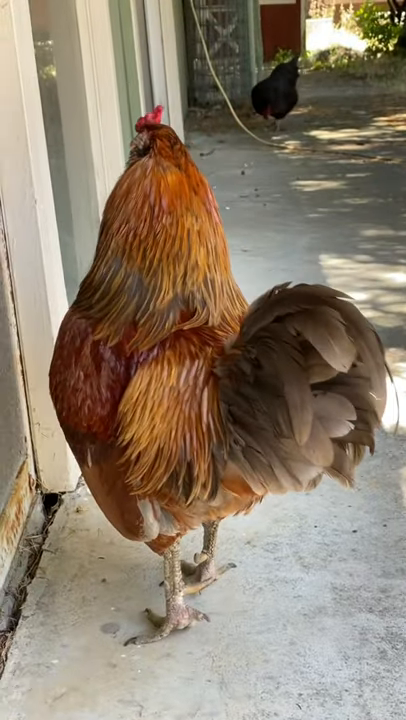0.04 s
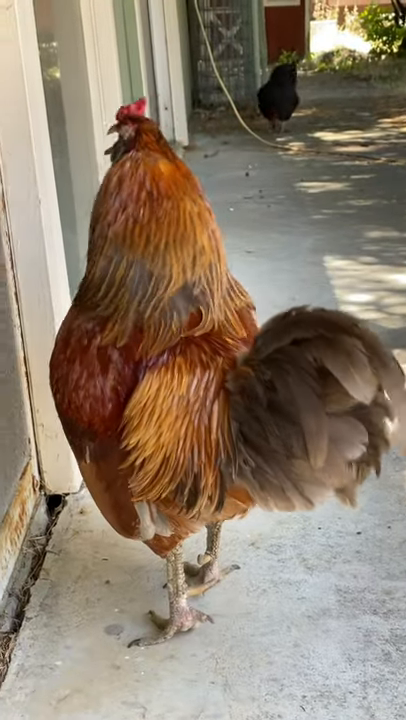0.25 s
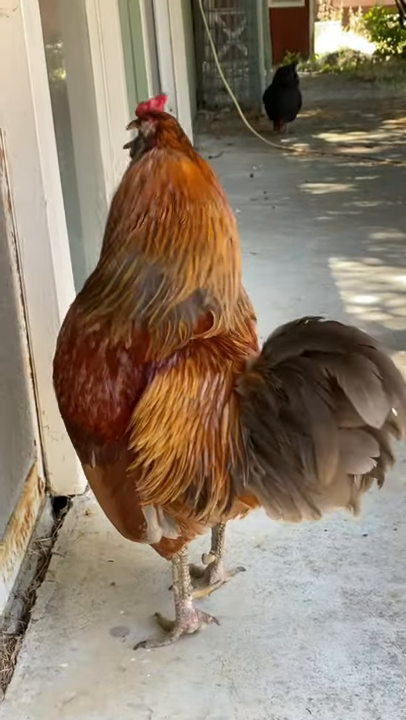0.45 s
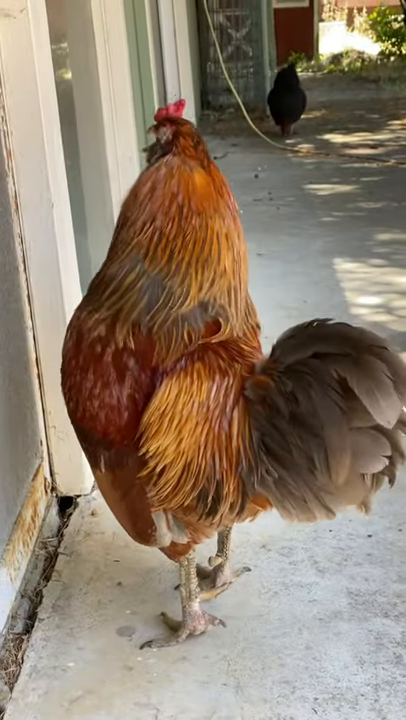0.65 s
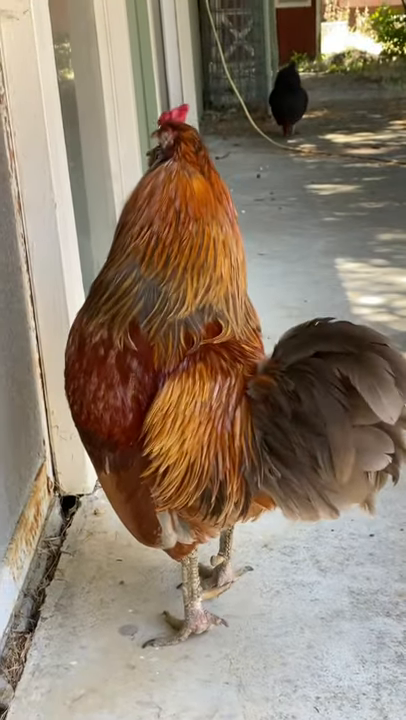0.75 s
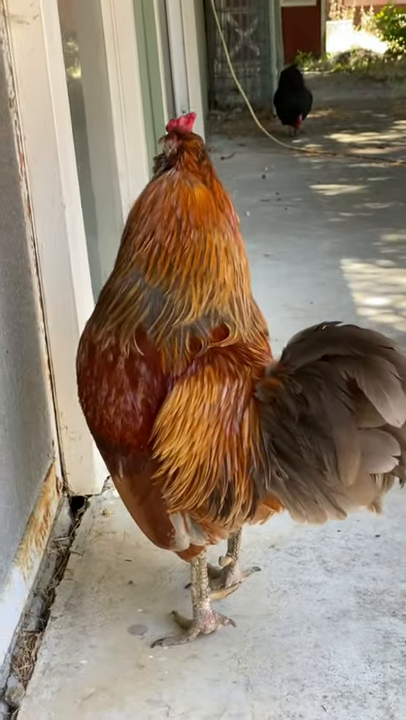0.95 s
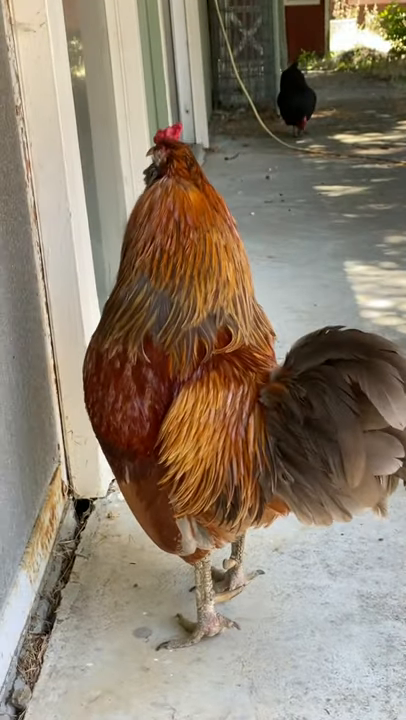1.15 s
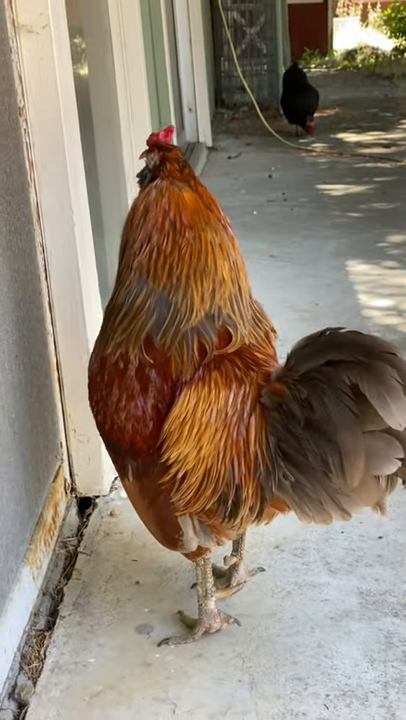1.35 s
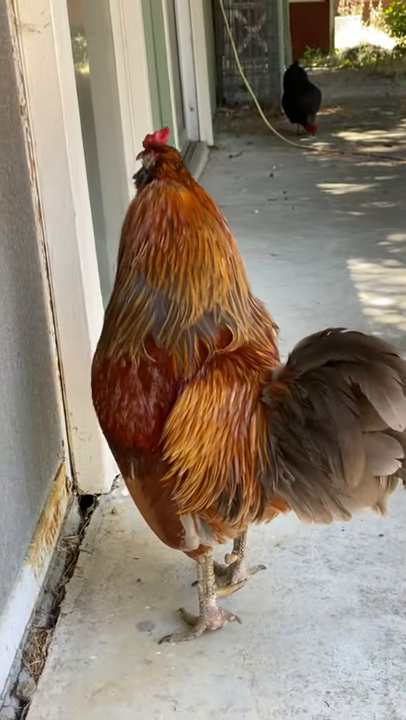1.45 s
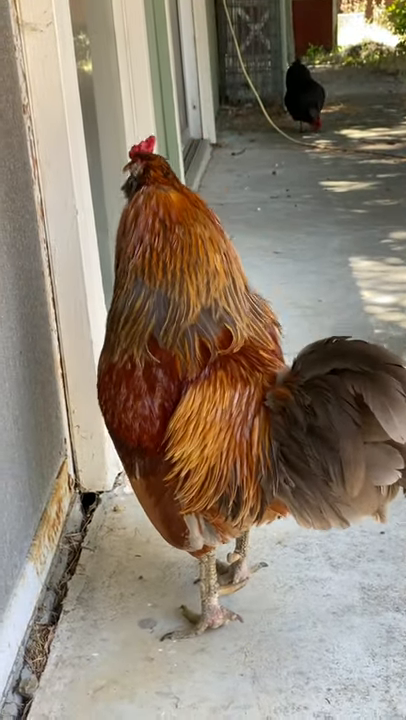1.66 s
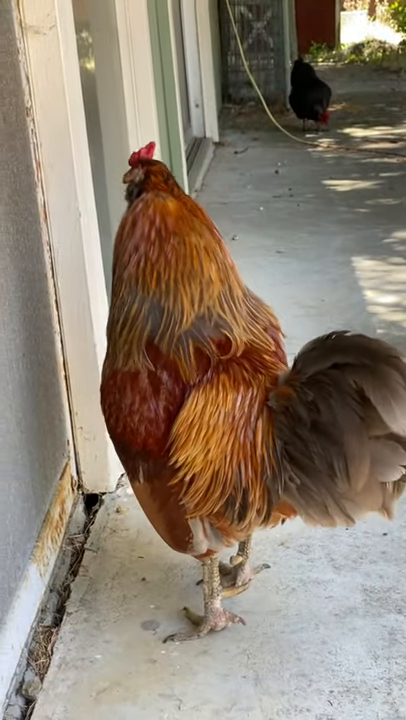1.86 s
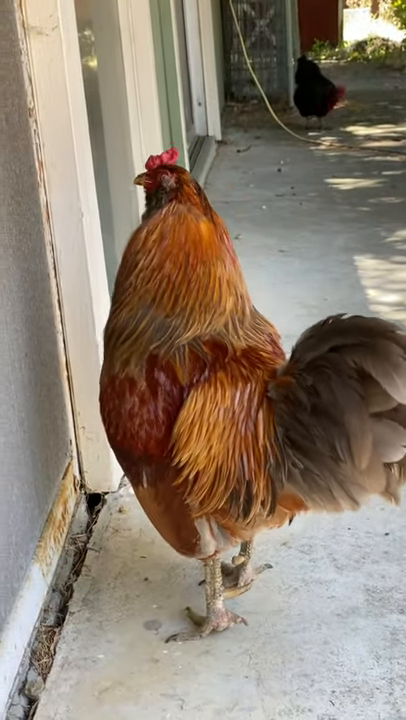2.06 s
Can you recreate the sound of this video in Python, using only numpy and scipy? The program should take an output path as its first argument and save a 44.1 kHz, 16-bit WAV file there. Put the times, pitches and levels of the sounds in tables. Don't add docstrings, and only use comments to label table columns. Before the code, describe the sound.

Close rooster crow on a patio, rough bursts leading into a long clear note breaking off hoarsely.

```python
import sys
import numpy as np
from scipy import signal
from scipy.fft import rfft, irfft, next_fast_len
from scipy.io import wavfile
from scipy.ndimage import uniform_filter1d

SR = 44100
rng = np.random.default_rng(int(sys.argv[2]) if len(sys.argv) > 2 else 0)


def wav_out(sig):
    wavfile.write(sys.argv[1], SR, np.round(np.clip(np.atleast_2d(sig).T, -1, 1) * 32767).astype(np.int16))


def gain_from_db(level_db):
    decades = np.asarray(level_db, float) / 20
    return 10 ** decades


N = 92610

# frequency in Hz, level in dB per Hz.
AIR_SPECTRUM = [(24, -25.5), (40, -6), (97, -5), (622, -30.5), (771, -26), (1660, -37.5), (1820, -42),
                (3150, -49.5), (12000, -51.5), (15600, -80), (22000, -120)]
# time in seconds, level in dB.
AIR_LEVEL = [(0.0, -49), (0.02, -51.5), (2.1, -65.5)]
# frequency in Hz, left minus right in dB.
PORT_DB = [(60, .3), (250, .6), (490, 5.5), (740, 7.8), (1120, 10.1), (1600, 0.68), (14000, 0.12)]
# frequency in Hz, lead of the left in radians.
PORT_LEAD = [(1460, 0.057), (2670, 0.89), (3900, 0.26), (4820, 1.4), (5170, 6.5), (8180, 8.1),
             (10900, 9.02), (12200, 10.4), (13500, 9.43)]
# centre in seconds, frequency in Hz, level in dB.
PUFFS = [(0.263, 340, -45), (0.475, 154, -55.5), (0.949, 343, -48), (1.861, 341, -43.5)]
# time in seconds, pitch in Hz, level in dB.
SQUEAK = [
    (.158, 590, -70),
    (.175, 700, -66),
    (.195, 780, -65),
    (.22, 840, -64),
    (.238, 865, -69),
]
# centre in seconds, pitch at the centre in Hz, level in dB.
CROAKS = [(.852, 2386, -25.5), (.888, 688.6, -28), (.921, 720, -36), (.947, 794, -28.5), (.97, 770, -32),
          (1.012, 900, -32), (1.05, 662, -37), (1.786, 1323, -24.5), (1.815, 2052, -29),
          (1.846, 693, -27.5)]
# time in seconds, pitch in Hz, level in dB.
FLUTTER = [
    (.33, 856.4, -19.5),
    (0.374, 767, -23),
    (0.427, 652, -32.5),
]
# time in seconds, pitch in Hz, level in dB, beak gape in dB.
SYLLABLE_1 = [(.238, 1060, -24, -21), (.246, 978.5, -15, -17.5), (.252, 795.5, -8.5, -22),
              (.285, 843, -13.5, 1), (.328, 869.5, -14, -5.5), (.336, 583, -19, 2), (.4, 583.5, -18.5, 7.5),
              (.425, 592.3, -26, -3.5), (.49, 590, -52, 1.5)]
SYLLABLE_2 = [(0.506, 564.2, -38, -7.5), (0.523, 618, -26.5, -5.5), (0.533, 800.4, -9.5, -9),
              (0.542, 915, -12.5, 0.5), (.568, 975.5, -14, 6), (.625, 916, -19, -7.5),
              (0.633, 862, -13.5, -6), (0.654, 808, -21.5, -3.5), (.662, 588, -31, 1)]
SYLLABLE_3 = [(0.702, 588.3, -32, -3.5), (.712, 632.7, -22, -4), (.728, 864.4, -15, -6),
              (0.771, 904.5, -16.5, -6), (0.78, 982.5, -19.5, 8.5), (0.843, 986, -24, 10.5),
              (0.849, 916.4, -19, 4), (0.892, 933.4, -22.5, 10.5), (.905, 995, -18.5, 2)]
BREAK = [
    (0.946, 1006, -13.5, 6),
    (1.002, 994.7, -18, 1),
    (1.02, 946.7, -23.5, -0.5),
    (1.029, 901, -18, -9),
    (1.073, 923.7, -20.5, -3),
]
LONG_NOTE = [(1.107, 953.4, -21.5, 6), (1.151, 890, -17, -3.5), (1.223, 889.6, -17, -11),
             (1.248, 931, -19.5, 1.5), (1.344, 965.2, -19.5, 8), (1.45, 964.8, -19.5, 0),
             (1.567, 966.6, -19.5, 5.5), (1.697, 959.7, -20, 8), (1.748, 938, -23, 8)]
CRACK = [(1.769, 923, -26, 9), (1.785, 866, -22, 7), (1.832, 793.5, -23.5, -3), (1.846, 723, -28.5, 0.5),
         (1.861, 688, -34.5, -2), (1.886, 680, -59, 4.5)]
# time in seconds, roughness from 0 to 1, period doubling (1 is full).
MEMBRANES = [(.24, .45, .3), (.26, .05, 0), (.3, .07, 0), (.315, .16, .2), (.34, .24, .3), (.41, .22, .2),
             (.52, .26, 0), (.535, .2, 0), (.56, .3, .2), (.585, .35, 1), (.6, .08, 0), (.645, .1, .1),
             (.665, .3, 0), (.712, .27, 0), (.73, .04, 0), (.78, .1, .05), (.845, .14, .5), (.87, .2, .2),
             (.888, .45, .3), (.91, .2, .9), (.99, .16, 1.3), (1.012, .3, 1), (1.03, .12, .4),
             (1.05, .22, .2), (1.08, .01, 0), (1.335, .004, .05), (1.4, .004, 1), (1.765, .01, 1),
             (1.78, .15, 1.5), (1.797, .28, 1.2), (1.81, .07, .7), (1.833, .06, .6), (1.848, .45, 1),
             (1.87, .3, 1)]
# time in seconds, windpipe tuning as a ratio, mouth in Hz, mouth in dB,
# upper windpipe in dB.
THROAT = [(.24, 0.92, 2036, -2, -7.5), (.27, 1, 2324, -4, 5.5), (.32, 0.95, 2324, -5, -3),
          (.345, 0.95, 2270, 2.5, 4), (.52, 1, 2396, -4.5, 2), (.555, 0.98, 2092, -0.5, 5.5),
          (.59, 0.89, 2128, 7.5, 4.5), (.625, 0.93, 2365, -11, 4), (.66, 1, 2274, -2, 4.5),
          (.72, 1, 2273, 3.5, 5), (.76, 1, 2430, -14, 5), (.855, 0.99, 2344, 3, 0),
          (.93, 0.96, 2108, -2.5, 10.5), (1.0, 0.97, 2247, 9.5, 1), (1.06, 0.97, 2070, -14, 5),
          (1.17, 1, 1944, 1.5, -1), (1.3, 0.93, 1930, -3.5, 4.5), (1.45, 1, 1960, -8, 0.5),
          (1.76, 1, 2092, 4, -15), (1.795, 0.84, 2015, -4, -33), (1.83, 0.89, 1635, 7, -29),
          (1.87, 0.85, 1713, 7, -10)]
# frequency in Hz, width in Hz, level in dB.
WINDPIPE = [(721, 470, 0.74), (1463, 67, -25.5), (1804, 133, -2), (2835, 360, -19), (3539, 97, -15)]
# centre in seconds, strength in dB.
FLARES = [(0.341, 8.5), (0.36, 4), (.421, -1.5), (0.584, 8), (0.379, 7.5), (0.394, 12.5), (0.559, 19),
          (0.919, 15.5), (0.949, 16.5), (0.967, 11), (1.797, 6)]
# time in seconds, frequency in Hz, level in dB.
TONGUE = [(.25, 5750, -33.5), (.3, 5884, -21), (.34, 5720, -9.5), (.53, 5140, -34), (.56, 5200, -18.5),
          (.58, 7300, -10.5), (.65, 5840, -26.5), (.76, 6340, -23.5), (.79, 7003, -7), (1.0, 6900, -14.5),
          (1.12, 6370, -26.5), (1.22, 6200, -35), (1.33, 5910, -26), (1.42, 5173, -13), (1.6, 5444, -9),
          (1.68, 5140, -9.5), (1.79, 5310, -17.5), (1.81, 4420, -11.5), (1.85, 4420, -17)]
# frequency in Hz, width in Hz, level in dB.
BEAK = [(4420, 380, -30.5), (5026, 120, -20), (5815, 490, -27.5), (7055, 280, -30.5), (8690, 660, -30.5),
        (11830, 2700, -40), (14900, 2300, -43)]
# time in seconds, frequency in Hz, width in Hz.
HOLLOW = [(.3, 3910, 600), (.7, 4240, 745), (1.1, 4140, 684), (1.4, 3955, 359), (1.76, 4060, 300),
          (1.82, 3725, 100.2)]

AIR_PATCHY_DB, AIR_SIDE_DB = 2.5, -28
PORCH_T60_S, PORCH_DB, PORCH_LOW_CUT_HZ, WALL_CUT_HZ = 0.34, -17, 1100, 9000
MIC_CUT_HZ, PUFF_S = 55, 0.019
SCUFF_S, SCUFF_LENGTH_S, SCUFF_HZ, SCUFF_DB = 0.083, 0.024, 3380, -64.5
SQUEAK_RISE_DB = 35
CROAK_S, CROAK_SAG_PER_S = 0.0096, 7
WOBBLE, WOBBLE_HZ = 0.0033, 25
DOUBLING_TURN, WEAK_PULSE = 0.16, 0.018
JITTER_TURN, JITTER_HZ, SHIMMER_DB, SHIMMER_HZ = 1.48, 130, 10, 77
FLICKER_DB, FLICKER_HZ = 3.0, 11
LOW_REGISTER_HZ, LOW_REGISTER_DB = 660, -9
BREATH_DB = -10
MOUTH_WIDTH_HZ, MOUTH_DB, TONGUE_WIDTH_HZ = 170, -2.5, 150
FLARE_S, LOW_CUT_HZ = 0.004, 700


def rms_one(x):
    return x / np.sqrt(np.mean(x ** 2) + 1e-20)


def in_time(rows):
    s, *columns = np.transpose(rows)
    return [np.interp(np.arange(N) / SR, s, c) for c in columns]


def at_hz(points, hz):
    table_hz, value = np.transpose(points)
    return np.interp(np.log(hz + 1), np.log(table_hz), value)


def bump(centre_s, spread_s):
    return np.exp(-.5 * ((np.arange(N) / SR - centre_s) / spread_s) ** 2)


def drift(hz, step=1):
    r = np.exp(-2 * np.pi * hz * step / SR)
    noise = rng.standard_normal((N + SR) // step + 1)
    slow = signal.lfilter([1], [1, -2 * r, r * r], noise)[SR // step:]
    return np.interp(np.arange(N) / step, np.arange(len(slow)), rms_one(slow))


def resonate(x, hz, width_hz):
    step = 256 if np.ndim(hz) else N
    r = np.exp(-np.pi * np.broadcast_to(width_hz, N)[::step] / SR)
    turn = 2 * r * np.cos(2 * np.pi * np.broadcast_to(hz, N)[::step] / SR)
    out, state = np.zeros(N), np.zeros(2)
    for k, i in enumerate(range(0, N, step)):
        gain = (1 - r[k] ** 2) / 2
        poles = [1, -turn[k], r[k] ** 2]
        out[i:i + step], state = signal.lfilter([gain, 0, -gain], poles, x[i:i + step], zi=state)
    return out


def resonate_twice(x, hz, width_hz):
    return resonate(resonate(x, hz, width_hz), hz, 2 * width_hz)


def air():
    out, edges = 0, 25 * 2 ** np.arange(0, 9.1, .5)
    white = rng.standard_normal((2, 2, N))
    for k, (low, high) in enumerate(zip(edges, edges[1:])):
        band = signal.butter(2, [low, high], "band", fs=SR, output="sos")
        mid, side = signal.sosfilt(band, white[k % 2])
        level_db = at_hz(AIR_SPECTRUM, np.sqrt(low * high)) + AIR_PATCHY_DB * drift(6.1, step=32)
        out = out + gain_from_db(level_db) * (mid + gain_from_db(AIR_SIDE_DB) * side * [[1], [-1]])
    return rms_one(out) * gain_from_db(in_time(AIR_LEVEL)[0])


def porch(x):
    size = next_fast_len(N + SR)
    z = np.exp(-2j * np.pi * np.arange(size // 2 + 1) / size)
    dull = np.exp(-2 * np.pi * WALL_CUT_HZ / SR)
    answer = np.zeros((2, len(z)), complex)
    for k, lag in enumerate((rng.uniform(.012, .045, 12) * SR).astype(int)):
        loop = gain_from_db(-60 * lag / SR / PORCH_T60_S) * (1 - dull) / (1 - dull * z) * z ** lag
        answer[k % 2] += (-1) ** (k // 2) * loop / (1 - loop)
    thin = signal.lfilter(*signal.butter(1, PORCH_LOW_CUT_HZ, "high", fs=SR), x)
    return irfft(rfft(thin, size) * answer, size)[:, :N]


def ports(x):
    size = next_fast_len(N + 4096)
    hz = np.arange(size // 2 + 1) * SR / size
    tilt = gain_from_db(at_hz(PORT_DB, hz) / 2) * np.exp(.5j * at_hz(PORT_LEAD, hz))
    pair = np.array([tilt, 1 / tilt])
    pair = pair * 2 / np.abs(pair).sum(axis=0)
    return irfft(rfft(x, size) * pair, size)[:, :N]


def puffs():
    out = np.zeros(N)
    for s, hz, db in PUFFS:
        lump = rms_one(resonate(rng.standard_normal(N), hz, hz / 2))
        out += gain_from_db(db) * bump(s, PUFF_S) * lump
    return out


def scuff():
    t = np.arange(N) / SR - SCUFF_S
    brush = rms_one(resonate(rng.standard_normal(N), SCUFF_HZ, 1800))
    return gain_from_db(SCUFF_DB) * brush * (t > 0) * np.exp(-np.abs(t) / SCUFF_LENGTH_S)


def squeak():
    start, end = (SQUEAK[0][0] - .01, 500, -120), (SQUEAK[-1][0] + .005, 870, -120)
    pitch_hz, level_db = in_time([start] + SQUEAK + [end])
    turn = 2 * np.pi * np.cumsum(pitch_hz * (1 + .003 * drift(60))) / SR
    late = gain_from_db(SQUEAK_RISE_DB * (pitch_hz / pitch_hz.max() - 1))
    first, fourth, fifth = late ** 2 * 4 * np.sin(turn), late * 2 * np.sin(4 * turn), np.sin(5 * turn)
    return gain_from_db(level_db) * (first + fourth + fifth)


def croaks():
    out = np.zeros(N)
    for s, hz, db in CROAKS:
        t = np.arange(N) / SR - s
        cycles = np.sin(2 * np.pi * hz * t * (1 - CROAK_SAG_PER_S * t / 2))
        out += gain_from_db(db) * bump(s, CROAK_S) * cycles
    return out


def flutter():
    start, end = (FLUTTER[0][0] - .01, 870, -90), (FLUTTER[-1][0] + .01, 600, -90)
    hz, level_db = in_time([start] + FLUTTER + [end])
    level = gain_from_db(level_db + 4.4 * drift(67))
    return level * np.sin(2 * np.pi * np.cumsum(hz * (1 + 0.084 * drift(85.8))) / SR)


def syrinx(pitch_hz, rough, doubling):
    wobbling_hz = pitch_hz * (1 + WOBBLE * drift(WOBBLE_HZ))
    turn = np.pi * np.cumsum(wobbling_hz) / SR + JITTER_TURN * rough * drift(JITTER_HZ) / 2
    pulses = np.zeros(N)
    for k in range(1, 35):
        late = k * DOUBLING_TURN * doubling
        share = np.sin(late) + WEAK_PULSE * doubling if k % 2 else np.cos(late)
        if k > 4:
            level = gain_from_db(FLICKER_DB * drift(FLICKER_HZ, 32))
        else:
            level = gain_from_db(LOW_REGISTER_DB * (pitch_hz < LOW_REGISTER_HZ))
        below_limit = k * pitch_hz < .8 * SR
        pulses += share * level * np.cos(k * turn) * below_limit
    breath = gain_from_db(BREATH_DB) * rough * 4 * rng.standard_normal(N) * (1 + np.cos(2 * turn))
    return (pulses + breath) * gain_from_db(SHIMMER_DB * rough * drift(SHIMMER_HZ))


def throat(x, gape_db):
    tuning, mouth_hz, mouth_db, upper_db = in_time(THROAT)
    tongue_hz, tongue_db = in_time(TONGUE)
    flare_db = sum(db * bump(s, FLARE_S) for s, db in FLARES)
    out = -gain_from_db(MOUTH_DB + mouth_db) * resonate_twice(x * gain_from_db(flare_db), mouth_hz, MOUTH_WIDTH_HZ)
    out += gain_from_db(tongue_db) * resonate_twice(x, tongue_hz, TONGUE_WIDTH_HZ)
    for k, (hz, width_hz, db) in enumerate(WINDPIPE):
        upper = k > 2
        sign = (-1) ** (k + upper)
        out += sign * gain_from_db(db + upper_db * upper) * resonate_twice(x, hz * tuning, width_hz)
    for k, (hz, width_hz, db) in enumerate(BEAK):
        out += (-1) ** k * gain_from_db(db + gape_db) * resonate_twice(x, hz, width_hz)
    for _ in range(2):
        out -= resonate(out, *in_time(HOLLOW))
    return signal.sosfilt(signal.butter(3, LOW_CUT_HZ, "high", fs=SR, output="sos"), out)


def crow():
    rows = SYLLABLE_1 + SYLLABLE_2 + SYLLABLE_3 + BREAK + LONG_NOTE + CRACK
    start = (rows[0][0] - .004, rows[0][1], -90, 0)
    end = (rows[-1][0] + 0.018, rows[-1][1], -90, 0)
    pitch_hz, level_db, gape_db = in_time([start] + rows + [end])
    voice = throat(syrinx(pitch_hz, *in_time(MEMBRANES)), gape_db)
    running_rms = np.sqrt(uniform_filter1d(voice ** 2, size=1300) + 1e-12)
    return voice / running_rms * gain_from_db(level_db)


def scene():
    bird = crow() + croaks() + flutter() + squeak() + scuff()
    return ports(bird + gain_from_db(PORCH_DB) * porch(bird)) + air() + puffs()


def band_limit(x):
    return signal.sosfilt(signal.butter(12, 15800, fs=SR, output="sos"), x)


def record(dry):
    rounded = 2.5 * np.tanh(dry / 2.5)
    cut = signal.sosfilt(signal.butter(2, MIC_CUT_HZ, "high", fs=SR, output="sos"), rounded)
    return band_limit(cut)


dry = scene()
out = record(dry)
wav_out(out)
```